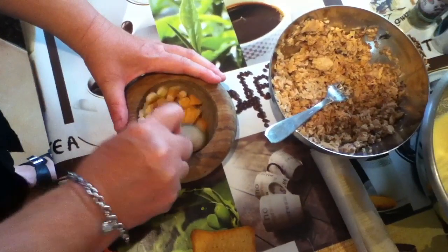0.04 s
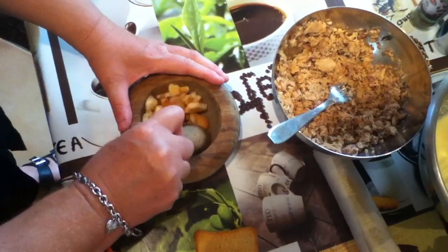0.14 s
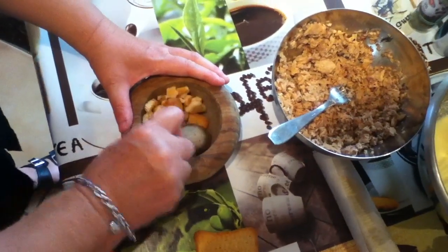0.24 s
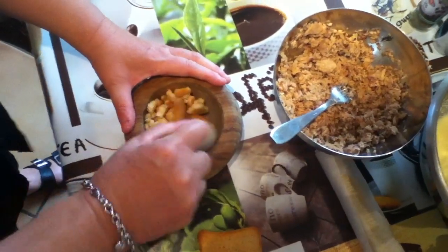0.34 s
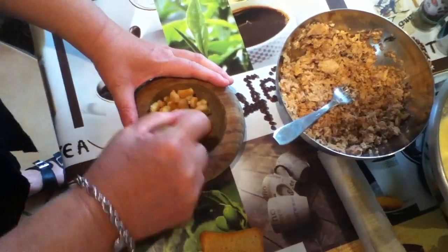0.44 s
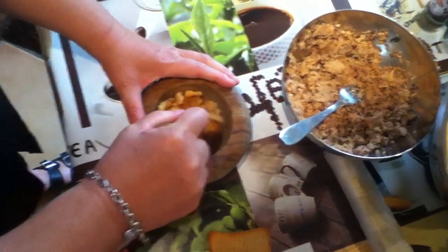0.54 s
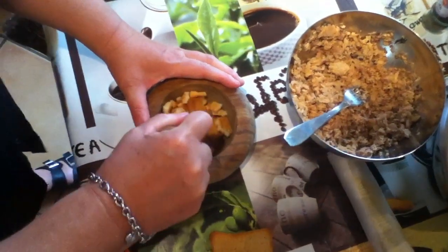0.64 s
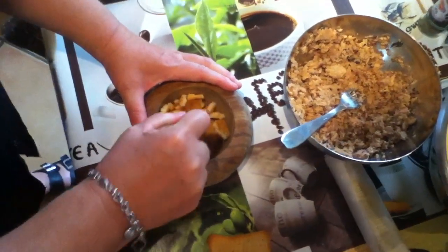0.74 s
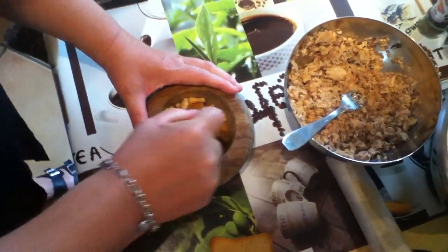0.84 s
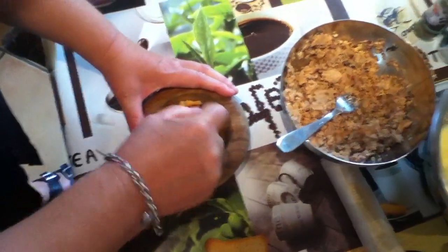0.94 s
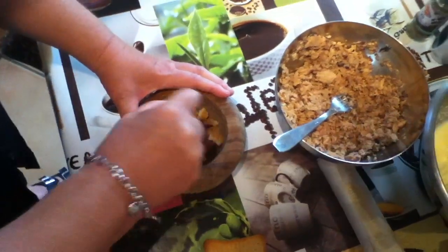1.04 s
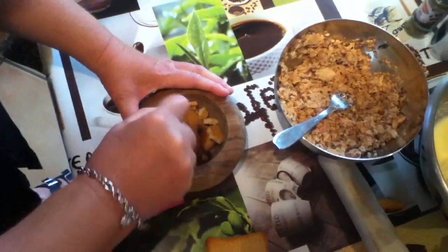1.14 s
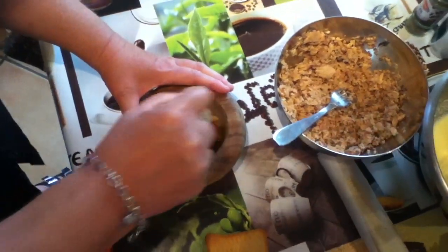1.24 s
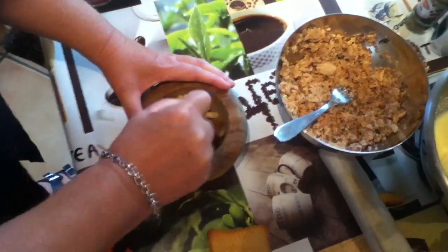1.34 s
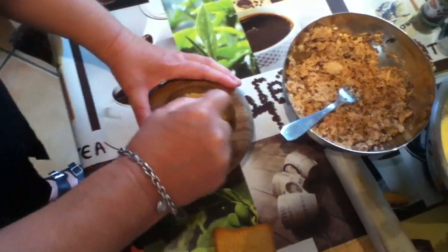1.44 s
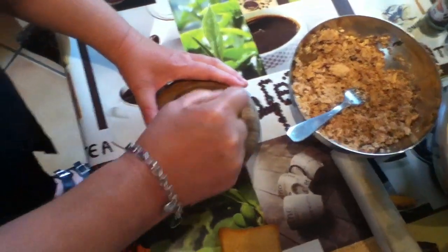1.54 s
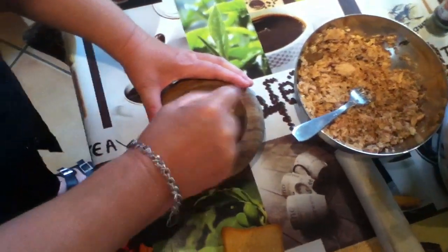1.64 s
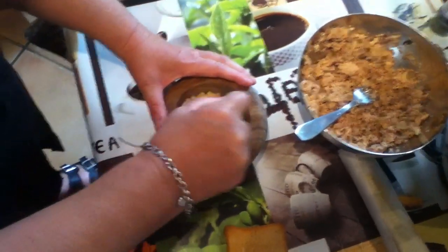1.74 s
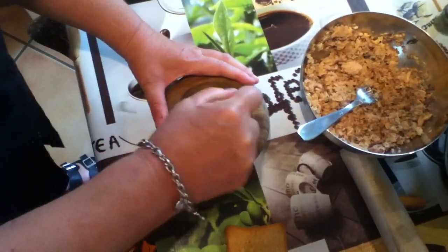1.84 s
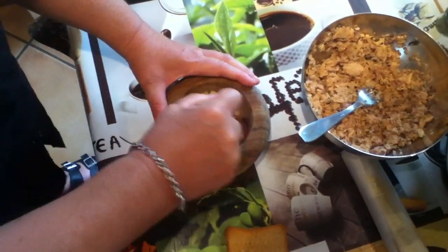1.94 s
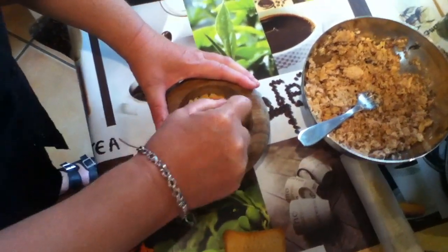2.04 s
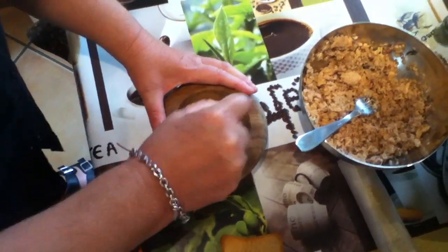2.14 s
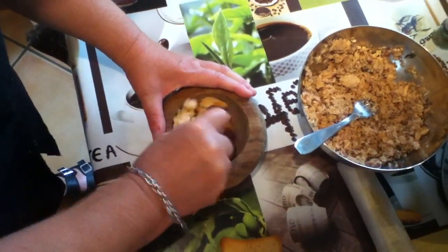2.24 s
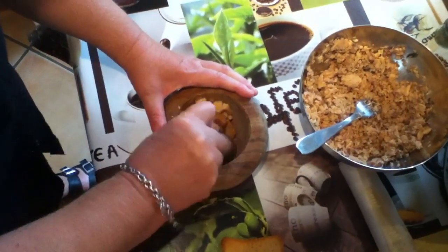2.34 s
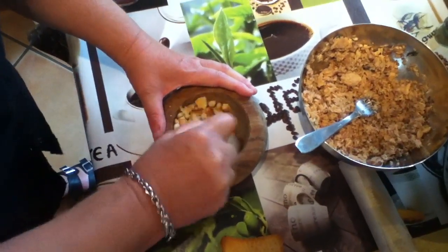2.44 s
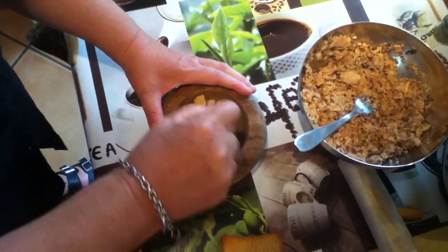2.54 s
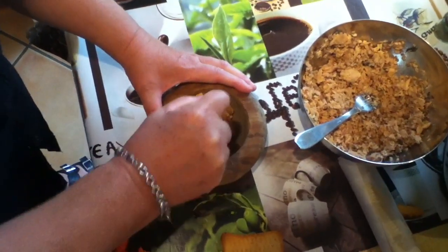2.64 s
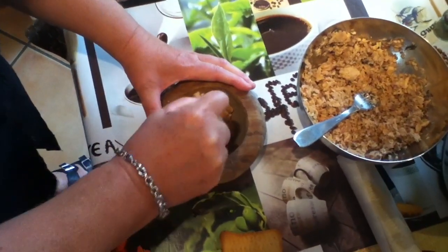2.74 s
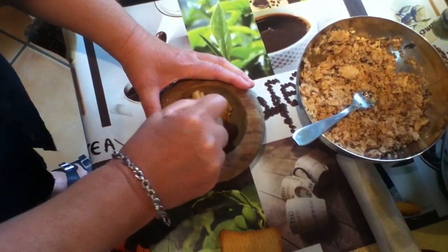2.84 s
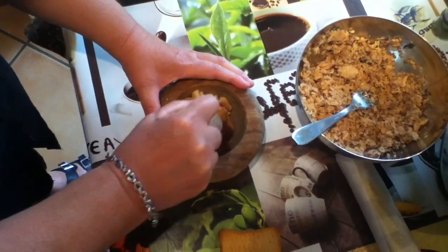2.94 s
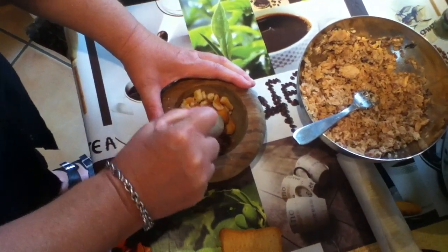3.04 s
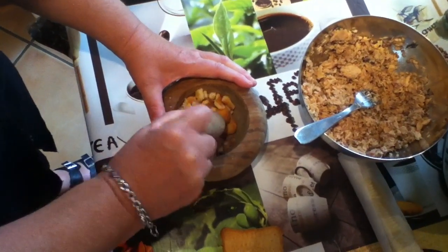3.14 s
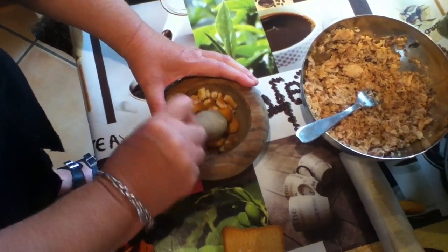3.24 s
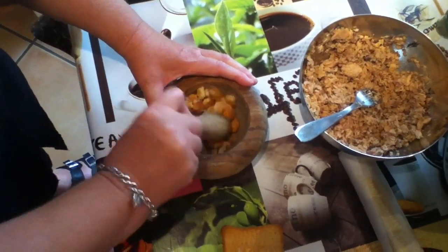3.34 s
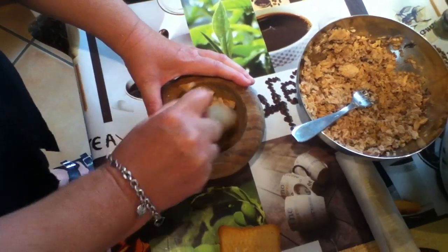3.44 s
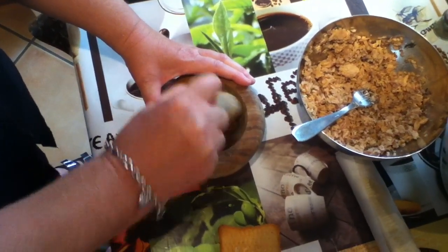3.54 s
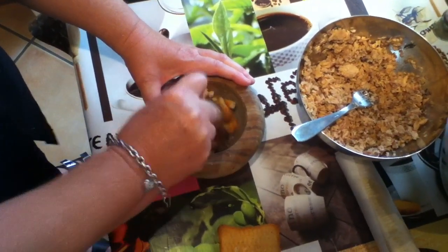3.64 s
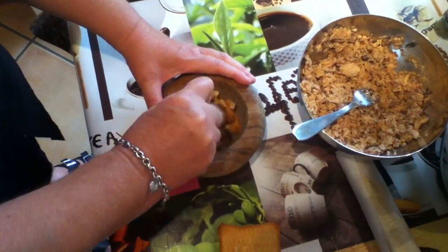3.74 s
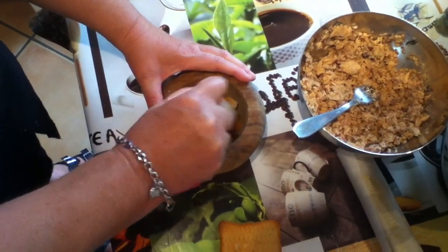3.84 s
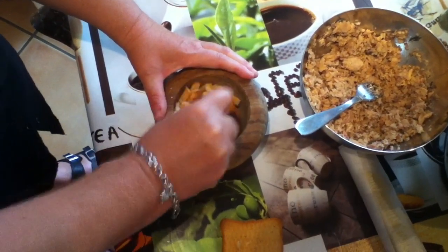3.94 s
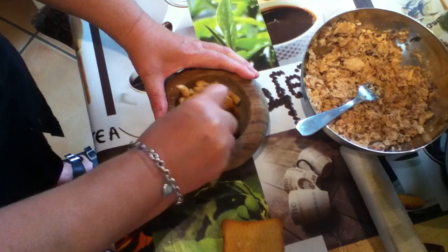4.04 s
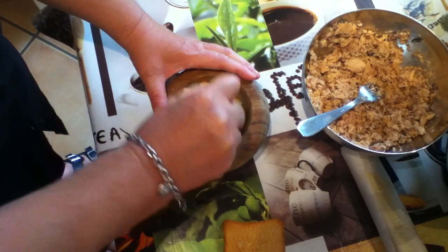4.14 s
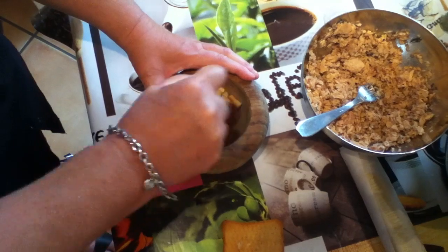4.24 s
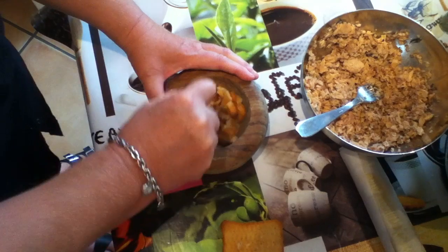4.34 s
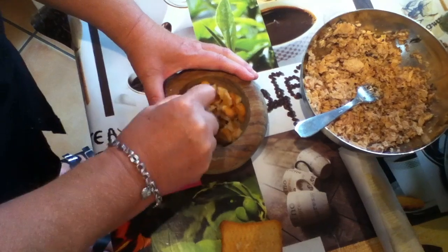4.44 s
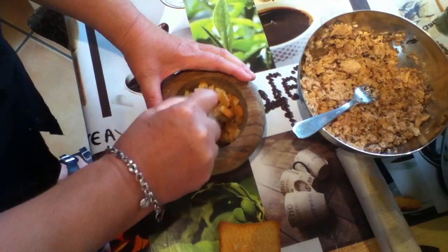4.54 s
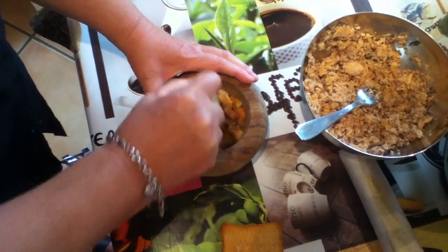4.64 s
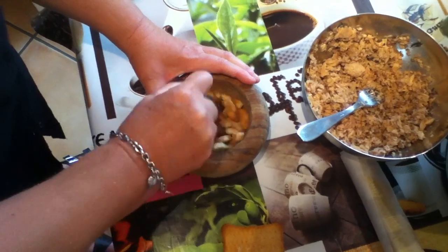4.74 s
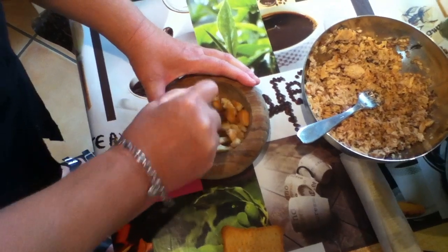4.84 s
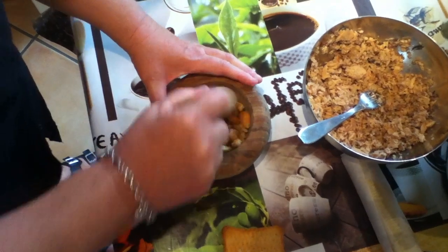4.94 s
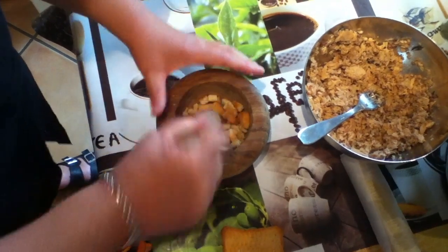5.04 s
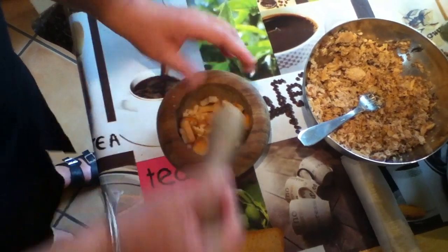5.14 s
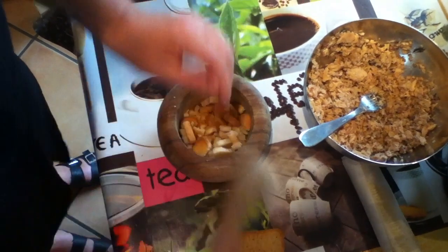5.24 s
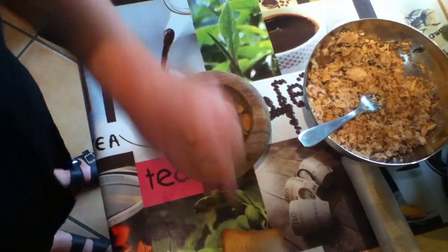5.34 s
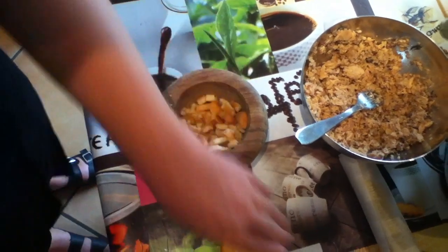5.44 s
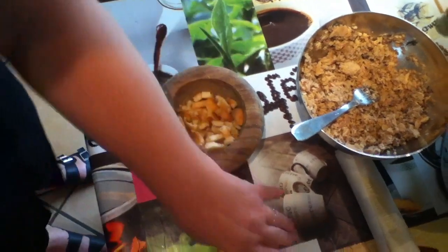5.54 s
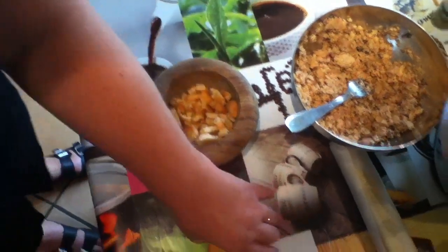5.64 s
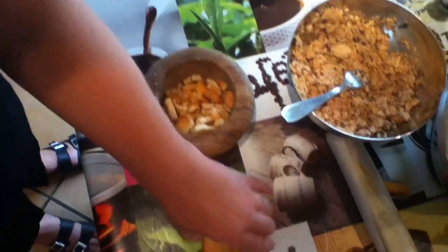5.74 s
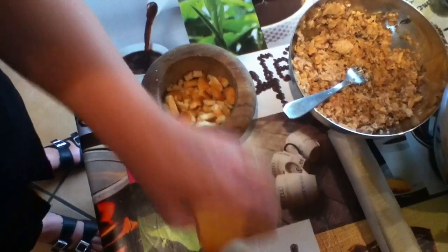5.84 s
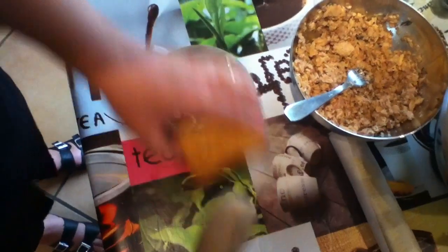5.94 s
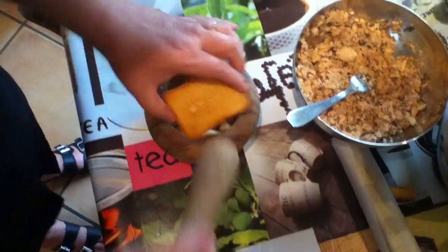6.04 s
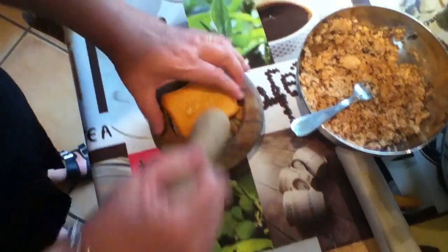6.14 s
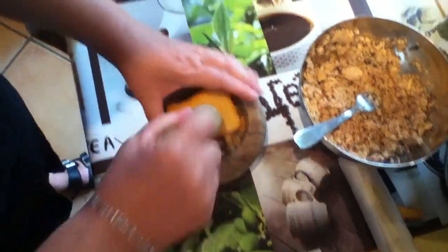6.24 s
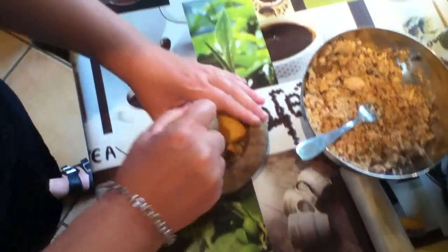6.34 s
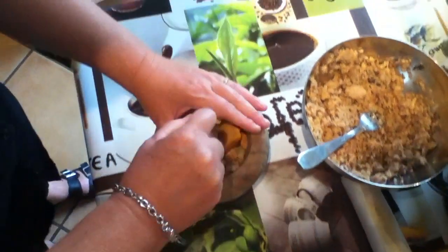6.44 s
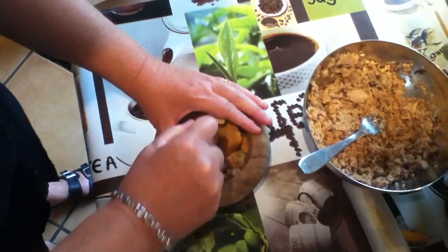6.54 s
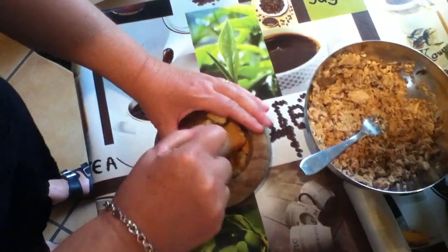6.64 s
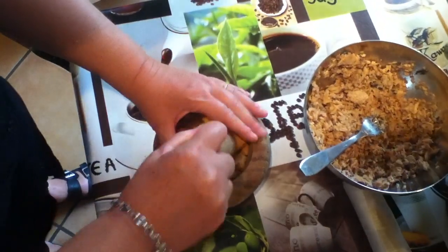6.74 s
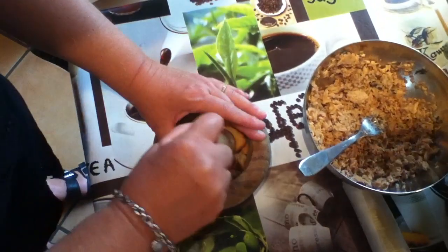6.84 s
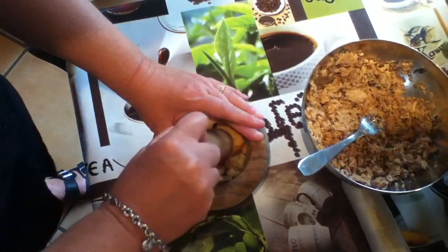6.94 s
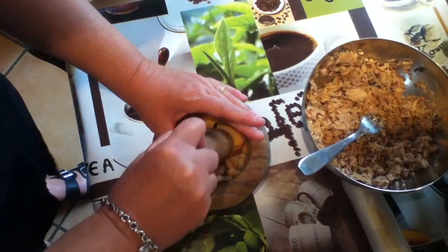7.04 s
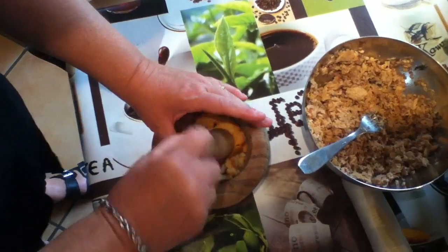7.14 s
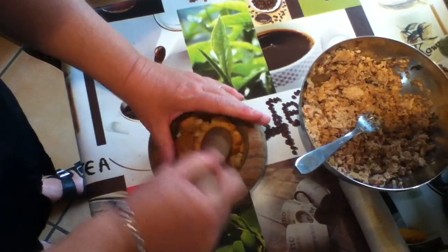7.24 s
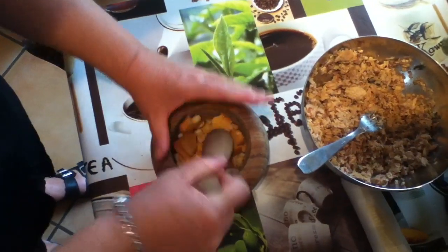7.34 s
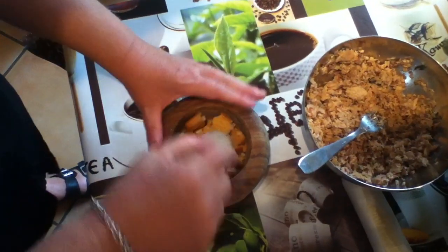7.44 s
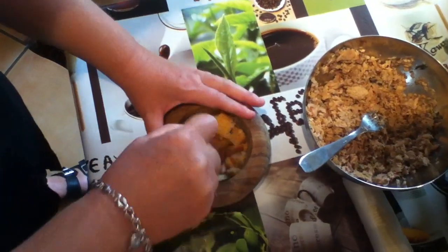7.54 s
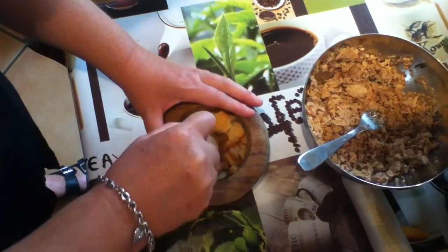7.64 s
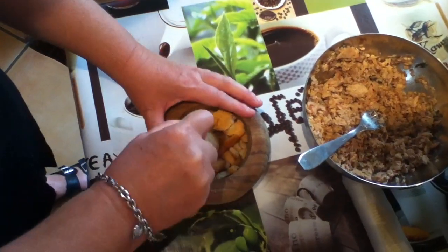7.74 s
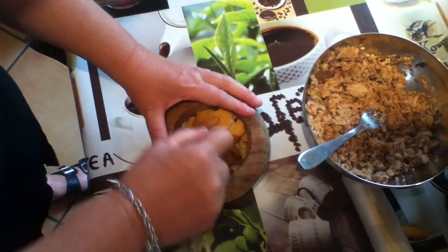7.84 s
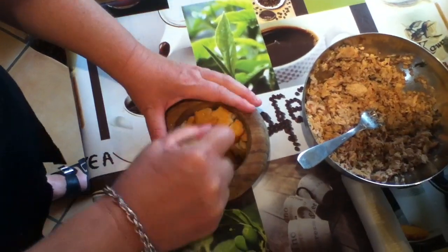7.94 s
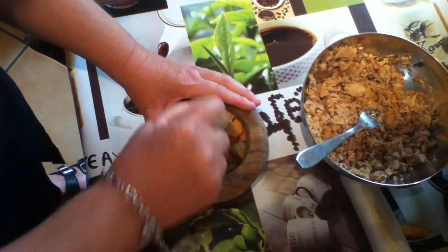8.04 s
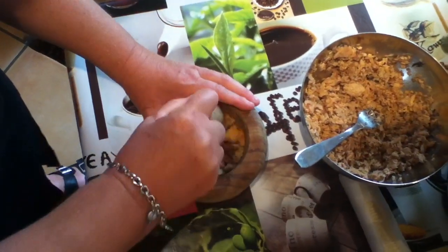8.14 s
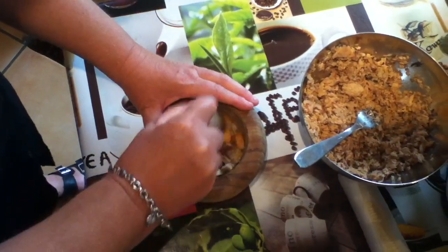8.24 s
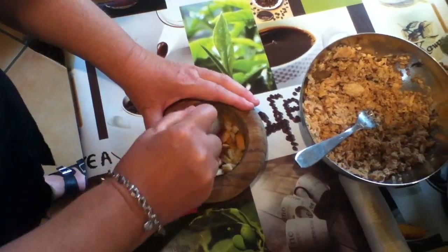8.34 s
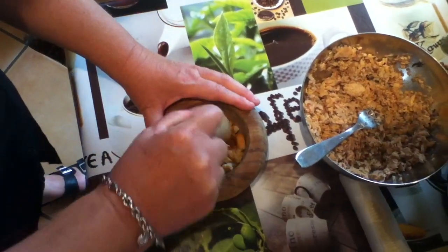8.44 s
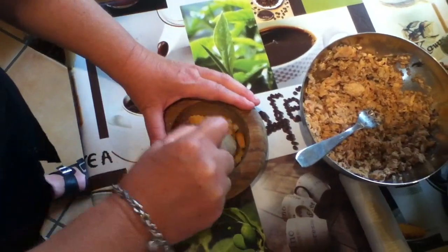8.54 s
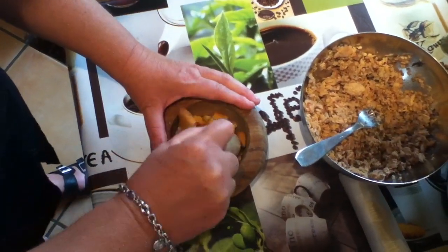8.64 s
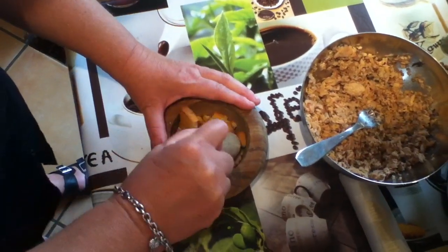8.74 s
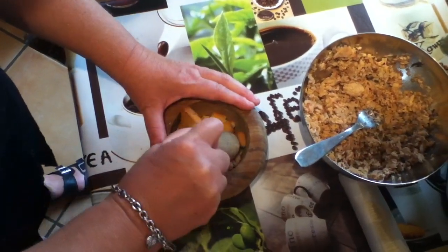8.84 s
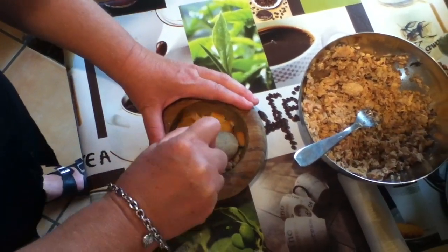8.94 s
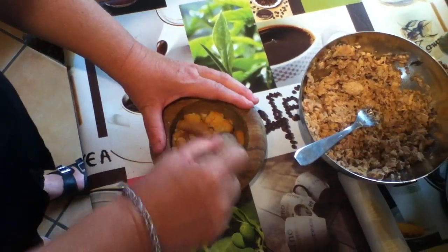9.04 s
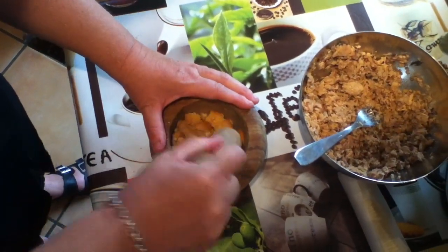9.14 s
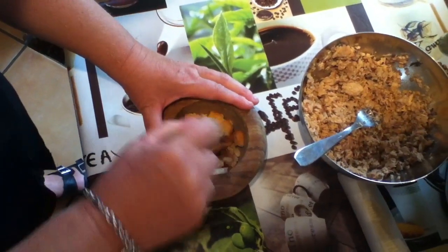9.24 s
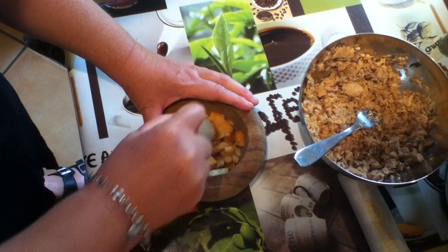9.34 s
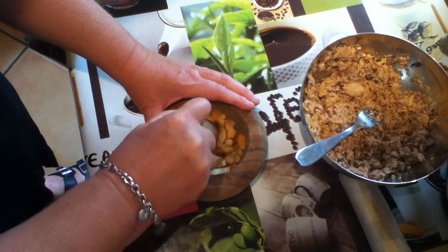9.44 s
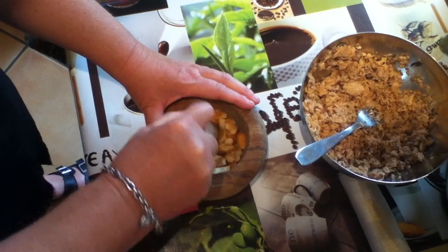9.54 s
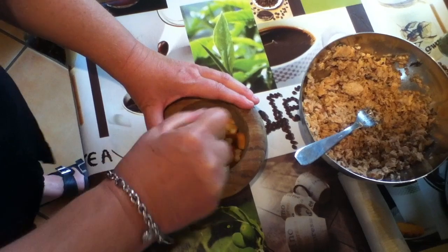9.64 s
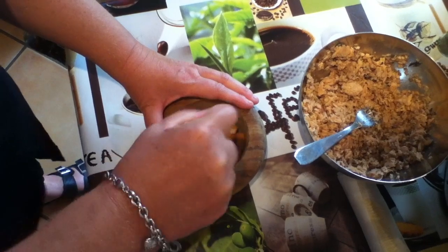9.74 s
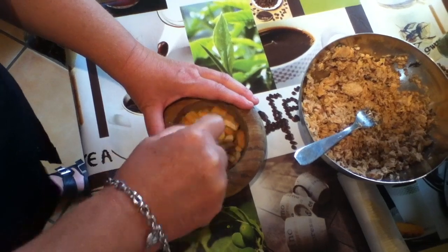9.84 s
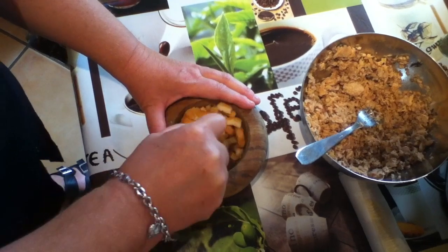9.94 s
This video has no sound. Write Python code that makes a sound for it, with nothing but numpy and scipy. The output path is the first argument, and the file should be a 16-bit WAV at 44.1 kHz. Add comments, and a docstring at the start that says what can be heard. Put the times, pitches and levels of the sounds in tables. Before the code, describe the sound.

Dry crisp toast breaks up in a wooden mortar: uneven bursts of crackle and fine crumbly fizz, hard pieces ticking, the pestle sometimes knocking bare wood and thudding the table. After a short, nearly quiet gap in the middle, new pieces are crushed with coarse crunches and a heavy knock. The microphone is close and fairly dry, with slight small-room reflections and a low steady hum.

```python
"""In a small kitchen, a wooden pestle crushes dry rusks in a wooden mortar on a table.
Each push makes the toast give way in bursts of tiny fractures: random clicks that ring the bowl and
the pestle and thump the table. Hard pieces snap with sharp filtered ticks, and the pestle now and then
knocks on bare wood, heard as dying sine waves. Behind it lie shaped noise and an appliance's wavering hum."""
import sys
import numpy as np
from scipy import signal
from scipy.fft import rfft, irfft
from scipy.io import wavfile

SR = 44100
rng = np.random.default_rng(int(sys.argv[2]) if len(sys.argv) > 2 else 0)


def generate_wav(sig):
    """Save sig (samples, or channels by samples) to the path in sys.argv[1] as 16-bit PCM at SR."""
    pcm = np.round(np.clip(np.atleast_2d(sig).T, -1, 1) * 32767).astype(np.int16)
    wavfile.write(sys.argv[1], SR, pcm)


N = 440118  # length in samples

# Natural tones of the mortar bowl, of the pestle, and of the table under the mortar.
# Each row: frequency in Hz, relative level in dB, time to fade by 60 dB in seconds.
BOWL_MODES = [(733, -1.5, 0.16), (803, 3, 0.23), (904, 13, 0.075), (981, 9.5, 0.14), (1110, -36, 0.049),
              (1175, -9, 0.26), (1351, 16.5, 0.029), (1410, -11, 0.018), (1526, 10, 0.0099)]
PESTLE_MODES = [(2000, -46, 0.058), (2246, -24, 0.048), (2120, 10.5, 0.066), (2214, -0.5, 0.099),
                (2290, 5.5, 0.092), (2280, -14.5, .08), (2730, 6, 0.14), (3300, -37, 0.13),
                (3370, -3, 0.045)]
TABLE_MODES = [(134, 0, .19), (190, -7, .06), (216, -2, .1), (243, -3, .08), (288, -1, .11),
               (325, -1.5, .13), (365, -4.5, .1), (405, -7.5, .08)]

# Colour of the coarse fractures, and of those muffled deep in the bowl.
# Each row: frequency in Hz, relative level in dB.
CRUNCH_COLOUR = [(500, -53), (1200, -0.5), (1750, -3), (2150, 5.5), (2900, 2.5), (4100, 2), (5000, -2),
                 (5900, -2), (7000, -21), (16000, -38.5)]
HOLLOW_COLOUR = [(100, -14.5), (500, -19.5), (680, -2.5), (950, 10.5), (1500, 5), (1800, -1), (2600, -21.5),
                 (8000, -55.5)]

# The pushes of the pestle.
# Each row: touch in seconds, pressing time until the toast gives way in seconds, collapse length in
# seconds, crumbling level in dB, collapse level in dB, extra bowl ring in dB, extra table thump in dB.
PUSH_ROWS = [(0.097, 0.032, 0.088, -22.5, -25.5, -8, -8.5), (.272, 0.019, 0.12, -31, -40.5, -4.5, 3),
             (.594, 0.032, 0.014, -31.5, -21, -5.5, -5), (.856, 0.0026, 0.011, -36, -28, -3.5, -3),
             (1.081, .006, 0.021, -18, -28.5, -5.5, -8), (1.141, .03, 0.06, -43, -42.5, 4, -6),
             (1.263, 0.012, 0.012, -45, -40.5, -0.5, -9), (1.468, 0.002, 0.0032, -24, -12.5, -2, -2),
             (1.749, 0.0027, 0.0095, -18, -12.5, -6, -21), (2.012, .004, 0.0026, -22, -14, -6, -4.5),
             (2.268, .038, 0.029, -26.5, -21.5, -5.5, -8), (2.378, 0.13, 0.0057, -41, -38.5, -4, -8),
             (2.689, 0.027, 0.0026, -54, -18, -11, -3), (2.752, 0.059, 0.037, -39, -21, -13, -5),
             (2.928, 0.12, 0.022, -39.5, -20, -13, -5.5), (3.108, 0.12, .135, -41.5, -38, -4.5, -8.5),
             (3.393, 0.033, 0.027, -36, -17, -10.5, -8.5), (3.723, 0.029, 0.026, -29, -13.5, -11, -4),
             (4.032, .008, 0.023, -31, -16, -7.5, -1), (4.362, 0.078, 0.039, -24.5, -20, -8.5, -7.5),
             (4.52, 0.062, 0.027, -37, -46, -9, -2.5), (4.758, 0.073, 0.025, -21, -18, -10, -4.5),
             (5.133, 0.0018, 0.00097, -43, -33, -6.5, -18), (6.217, 0.00059, .001, -38, -31, -1, -3),
             (6.421, 0.0031, 0.0092, -19, -17, 3, -4.5), (6.461, 0.047, 0.034, -24.5, -19, -7.5, -6),
             (6.858, 0.021, 0.0093, -52, -22, 2, -2.5), (6.933, 0.037, 0.0047, -39, -29, -5, 0.5),
             (6.996, 0.0042, 0.023, -27, -22.5, -9, -2.5), (7.12, 0.086, 0.0035, -38.5, -16.5, -11.5, -4),
             (7.228, 0.1, 0.041, -28, -27.5, -8.5, -3), (7.64, 0.0024, 0.051, -27, -24.5, -3, -20),
             (7.7, 0.077, 0.019, -24.5, -26, -7, -1), (7.808, 0.037, 0.084, -31.5, -26, -3, -2.5),
             (8.175, 0.018, 0.02, -29, -23, -1.5, -4), (8.223, .004, 0.046, -19, -20, -13, 0.5),
             (8.292, 0.06, .016, -22.5, -16, -9.5, -7.5), (8.62, 0.032, 0.11, -39, -24, -6, -5),
             (8.798, 0.1, 0.094, -39, -28.5, -10, -4.5), (9.071, 0.031, 0.039, -54, -24, -8, -4),
             (9.385, 0.022, 0.14, -32.5, -29.5, -0.5, -4), (9.535, 0.0092, 0.0092, -24, -12.5, -7, -5),
             (9.601, 0.066, 0.0088, -42, -38, -8, -4), (9.904, 0.053, .03, -26.5, -23.5, 0, -6)]


def amp(db):
    """Turns decibels into gain."""
    return 10 ** (np.asarray(db) / 20)


def unit(x):
    """Scales a response to energy 1."""
    return x / np.sqrt(np.sum(x ** 2) + 1e-20)


def read(points, hz):
    """Reads a table between its rows, along a log-frequency axis."""
    f, value = np.transpose(points)
    return np.interp(np.log(hz + 1), np.log(f + 1), value)


def add(mix, s, sound):
    """Mixes a sound in at s seconds."""
    part = mix[max(round(s * SR), 0):][:len(sound)]
    part += sound[:len(part)]


def through(x, response):
    """Passes a sound through a response."""
    return signal.oaconvolve(x, response)[:N]


def band_pass(x, low_hz, high_hz):
    """Keeps what lies between two frequencies."""
    return signal.sosfilt(signal.butter(2, [low_hz, high_hz], "band", fs=SR, output="sos"), x)


def high_pass(x, order, hz):
    """Keeps what lies above a frequency."""
    return signal.sosfilt(signal.butter(order, hz, "high", fs=SR, output="sos"), x)


def colour(points, size=2048):
    """Makes a click with the given spectrum and its energy as early as possible (minimum phase)."""
    hz = abs(np.fft.fftfreq(size, 1 / SR))
    log_gain = np.log(amp(read(points, hz)))
    spectrum = np.exp(np.conj(signal.hilbert(log_gain)))
    return unit(np.fft.ifft(spectrum).real[:size // 2])


def ring(modes, spread_db=0):
    """Rings a body as dying sine waves; where it is struck changes their shares."""
    t = np.arange(SR // 2) / SR
    shares = amp(spread_db * rng.standard_normal(len(modes)))
    out = np.zeros(len(t))
    for share, (hz, db, t60) in zip(shares, modes):
        out += share * amp(db - 60 * t / t60) * np.sin(2 * np.pi * hz * t)
    return out


def scatter(fall_s, db, size=600):
    """A click and its quick bounces between the walls of the bowl, as fading noise."""
    t = np.arange(size) / SR
    bounces = amp(db) * unit(rng.standard_normal(size) * np.exp(-t / fall_s))
    return unit(bounces + (t == 0))


def background(waver_hz=4, waver=0.39):
    """Steady air noise and the slightly wavering tones of an appliance."""
    # Spectrum of the air noise. Each row: frequency in Hz, relative level in dB.
    air_colour = [(15, -59), (25, -8), (108, -14.5), (120, -7), (137, 0.5), (200, -8.5), (263, -6),
                  (326, -7), (427, -14.5), (754, -13.5), (818, -13), (1290, -17.5), (1790, -14.5),
                  (2220, -20.5), (16000, -35)]
    # The appliance's tones. Each row: frequency in Hz, level in dB.
    hum_tones = [(100, -67.5), (150, -69), (199.5, -57), (329, -60), (807, -67.5), (1701, -80.5),
                 (1750, -59), (1798, -72), (1845, -64)]
    hz, t = np.fft.rfftfreq(N, 1 / SR), np.arange(N) / SR
    noise = rfft(rng.standard_normal(N))
    air = unit(irfft(noise * amp(read(air_colour, hz)), N)) * np.sqrt(N)
    hum, knots = np.zeros(N), np.linspace(0, t[-1], num=260)
    for tone_hz, db in hum_tones:
        # pitch and loudness wander separately
        drift = np.interp(t, knots, rng.standard_normal(len(knots)))
        flutter = np.interp(t, knots, rng.standard_normal(len(knots)))
        phase = 2 * np.pi * np.cumsum(tone_hz + waver_hz * drift) / SR
        hum += amp(db) * np.sqrt(2) * (1 + waver * flutter) * np.sin(phase)
    return amp(-48) * air + hum


def kitchen(x, delay_s=0.0026):
    """Dense reflections of a small room: fading noise whose treble dies sooner than its bass."""
    # How long the room rings. Each row: frequency in Hz, time to fade by 60 dB in seconds.
    room_fade = [(150, 0.52), (800, 0.46), (2200, 0.39), (6000, 0.3), (14000, 0.35)]
    hz, t, z = signal.stft(rng.standard_normal(SR // 2), SR, nperseg=256)
    fade = amp(-60 * t / read(room_fade, hz)[:, None])
    tail = signal.istft(z * fade, SR, nperseg=256)[1]
    # reflections build up over the first moments
    onset = np.minimum(np.arange(len(tail)) / SR / delay_s, 1) ** 2
    return through(x, unit(tail * onset))


def thuds(contact_s=0.002):
    """The pestle bottoms out: a smooth push on the table that favours its lowest modes."""
    # The booms. Each row: start in seconds, peak level in dB before the band filter.
    thud_rows = [(.189, -12), (0.22, -12.5), (.29, -17.5), (0.339, -19), (1.472, -10.5), (1.762, -11.5),
                 (2.02, -12), (6.254, -19.5), (7.009, -13.5), (8.227, -7.5), (8.25, -17), (8.355, -12.5),
                 (9.956, -11.5)]
    out = np.zeros(N)
    t = np.arange(SR // 50) / SR
    push = np.sin(np.pi * np.minimum(t / contact_s, 1)) ** 2
    for s, db in thud_rows:
        boom = signal.oaconvolve(ring(TABLE_MODES, spread_db=8.0), push)
        add(out, s, amp(db) * boom / abs(boom).max())
    return band_pass(out, 85, 450)


def knocks():
    """The pestle breaks through to the bowl: both ring, with a dry click and a hollow clack at contact."""
    # Wood meets wood. Each row: start in seconds, bowl strength in dB, pestle strength in dB.
    knock_rows = [(.122, -11.5, -14), (.447, -15, -28.5), (1.471, -20, -8.5), (2.016, -39, -8),
                  (2.301, -29.5, -4.5), (4.04, -4, -24), (6.246, -13, -30), (6.256, -2, -24),
                  (6.423, -23, -12), (7.643, -5.5, -33), (8.229, 1, -5.5), (9.543, -16, -9.5),
                  (9.961, -28, -6)]
    out = np.zeros(N)
    for s, bowl_db, pestle_db in knock_rows:
        click_db = max(bowl_db, pestle_db) - 11  # follows the stronger of the two
        click = np.convolve(scatter(fall_s=0.00083, db=6.0), colour(CRUNCH_COLOUR))
        clack = np.convolve(scatter(fall_s=0.0078, db=3), colour(HOLLOW_COLOUR))
        parts = [(bowl_db - 6.5, ring(BOWL_MODES)), (bowl_db - 13.0, clack),
                 (pestle_db, ring(PESTLE_MODES, spread_db=-4.0)), (click_db, click)]
        for db, sound in parts:
            add(out, s, amp(db) * sound / abs(sound).max())
    # the small bowl radiates little below its first mode
    return high_pass(out, 3, 620)


def strays(count=3, within_s=0.25, spread_db=3):
    """Time, level and pitch of small pieces that snap at random in the moments after each touch."""
    rows = []
    for s, press_s, length_s, *_ in PUSH_ROWS:
        lateness = within_s * rng.random(count)
        for late_s, (size, pitch) in zip(lateness, rng.standard_normal((count, 2))):
            # weaker by 4.5 dB with every length of the push that has gone by
            fade_db = 4.5 * late_s / (press_s + length_s)
            hz = 2400 * 2 ** (0.16 * pitch)  # spread in octaves
            rows.append((s + late_s, -22.5 - fade_db + spread_db * size, hz))
    return rows


def snaps(width=1.0, bowl_db=-27):
    """A hard piece breaks with one sharp tick that faintly rings the bowl."""
    # Single snaps of hard pieces, loud and faint.
    # Each row: start in seconds, relative peak level in dB, centre in Hz.
    single_snaps = [(0.2796, -12, 3500), (0.9062, -15, 2460), (0.9404, -14, 2120), (1.063, -19, 1840),
                    (1.0858, -10.5, 1790), (1.1463, -22, 4220), (1.1654, -10.5, 2930), (1.2173, -15, 1840),
                    (1.7541, -6, 2620), (2.22, -26.5, 2160), (2.944, -11.5, 2170), (3.1754, -11, 3980),
                    (3.3508, -24, 5210), (3.449, -9, 3600), (3.799, -4, 2730), (4.309, -29, 2120),
                    (4.6243, -16.5, 2670), (5.136, -29, 2900), (5.333, -26, 3390), (6.218, -13.5, 1200),
                    (6.302, -25, 4000), (6.7055, -19, 6400), (6.7517, -20, 4120), (6.9504, -10, 2120),
                    (6.998, -3, 2050), (7.1157, -13, 1970), (7.1507, -10.5, 5070), (7.4987, -22.5, 2290),
                    (7.641, -13, 1120), (8.228, -22, 2000), (8.748, -26, 1980), (8.809, -7, 2340),
                    (9.4622, -18, 1110), (9.541, -6, 2400), (9.643, -13, 1860)]
    out, bowl = np.zeros(N), ring(BOWL_MODES)
    for s, db, hz in single_snaps + strays():
        edges = [hz / (1 + width), min(hz * (1 + width), SR / 2 - 1)]
        band = signal.butter(1, edges, "band", fs=SR)
        tick = signal.lfilter(*band, scatter(fall_s=0.0017, db=40))
        add(out, s, amp(db) * tick / abs(tick).max())
        add(out, s, amp(db + bowl_db) * bowl / abs(bowl).max())
    return amp(-3.0) * band_pass(out, 800, 10000)


def clumps(depth_db, per_s=260):
    """One fracture sets off its neighbours, so a wandering gain gathers them in short avalanches."""
    wander = np.interp(np.arange(N) / SR * per_s, np.arange(N), rng.standard_normal(N))
    gain = amp(depth_db * np.clip(wander, -1.6, 1.6))
    return unit(gain) * np.sqrt(N)


def grains(per_s, spread_db, largest=4.4):
    """A steady stream of clicks of uneven size, rms 1."""
    size = amp(spread_db * np.minimum(rng.exponential(1, N), largest))
    clicks = size * rng.choice([-1, 1], N) * (rng.random(N) < per_s / SR)
    return unit(clicks) * np.sqrt(N)


def fractures(per_s, spread_db, fall_s, bounce_db, chip_db, low_hz, high_hz, cycles=4, piece_s=.012, count=24):
    """Cracks of uneven size, rms near 1, that bounce in the bowl and ring the chips that they break."""
    size = amp(spread_db * np.minimum(rng.exponential(1, N), 3.5))
    chance = np.clip(per_s / SR, 1e-6, 1)
    clicks = size * rng.choice([-1, 1], N) * (rng.random(N) < chance)
    # keep the strength even when the rate changes
    clicks /= np.sqrt(chance * np.mean(size ** 2))
    # cracks that run through the same piece have nearly the same pitch
    piece = rng.random(N)[(np.arange(N) / SR / piece_s).astype(int)]
    kind = ((piece + .13 * rng.standard_normal(N)) % 1 * count).astype(int)
    t, out = np.arange(600) / SR, np.zeros(N)
    # each kind of chip has its own pitch and its own bounces
    for k, hz in enumerate(np.geomspace(low_hz, high_hz, count)):
        chip = amp(chip_db) * unit(np.sin(2 * np.pi * hz * t) * np.exp(-hz * t / cycles))
        out += through(clicks * (kind == k), unit(scatter(fall_s, bounce_db) + chip))
    return out


def collapses(count=4):
    """Strength of crunch, fizz, bowl and thump: toast crumbles, gives way in an avalanche, and settles."""
    # How crunch, fizz, bowl and thump follow a push. Each row: dB while crumbling, dB in the collapse,
    # dB while settling, dB per dB of force, lag in seconds.
    follow_rows = [(-2.5, 1, 6.5, 1, 0), (-8, -5.5, 5.5, 0.8642, 0.0016), (-1.5, -1.5, 3, 1, 0.0027),
                   (-2, 0.5, 6, 0.6829, 0.0093)]
    # Fine fizz over the crunch as time goes on. Each row: time in seconds, extra level in dB.
    fizz_level = [(0, 2.5), (.9, 1.5), (1.5, 0.5), (1.8, -0.5), (2.05, 0.5), (2.8, 2), (3.6, 0.5),
                  (4.6, -2), (6.4, 2.5), (7.2, -0.5), (9.9, -0.5)]
    touch_s, avalanche_s, release_s = 0.0053, 0.014, 0.012
    settle_db, settle_s = -27, 0.056  # crumbs go on settling after a collapse
    usual_db = -28.5  # a push of ordinary force
    t, power = np.arange(SR) / SR, np.zeros((count, N))
    for s, press_s, length_s, crumble_db, collapse_db, bowl_db, thump_db in PUSH_ROWS:
        touch = np.minimum(t / min(press_s, touch_s), 1)
        build = np.exp(np.minimum(t - press_s, 0) / avalanche_s)
        after = np.maximum(t - press_s - length_s, 0)
        held = np.exp(-after / release_s)
        crumbling = touch * (1 - build)
        collapsing = touch * build * held
        settling = amp(settle_db) * (1 - held) * np.exp(-after / settle_s)
        phases = crumbling, collapsing, settling
        forces = np.array([crumble_db, collapse_db, collapse_db]) - usual_db
        fizz_db = np.interp(s, *np.transpose(fizz_level))
        own_levels = 0, fizz_db, bowl_db, thump_db
        for layer, own_db, (*phase_db, slope, lag_s) in zip(power, own_levels, follow_rows):
            gains = amp(usual_db + slope * forces + phase_db + own_db)
            add(layer, s + lag_s, (gains @ phases) ** 2)
    return np.sqrt(power)


def crushing():
    """Tiny fractures radiate directly and shake pestle, bowl and table."""
    # Colour of the fine dust. Each row: frequency in Hz, relative level in dB.
    fizz_colour = [(2500, -48.5), (5000, 5), (6300, 2), (7000, 0), (8500, 1), (10500, -3), (13000, -7.5),
                   (16000, -14.5)]
    crunch, fizz, bowl, thump = collapses()
    # thousands a second at full load, fewer as the push dies away
    busy = np.clip(crunch / amp(-23.5), .03, 2) ** .72
    bursts = clumps(depth_db=3.3)
    cracks = bursts * fractures(3400 * busy, spread_db=1.5, fall_s=0.0023, bounce_db=12.5,
                                chip_db=-5.5, low_hz=1536, high_hz=7160)
    dust = bursts * fractures(6000 * busy, spread_db=0.5, fall_s=0.00043, bounce_db=16.0,
                              chip_db=-18.5, low_hz=5160, high_hz=14600)
    direct = amp(-4) * through(cracks * crunch, colour(CRUNCH_COLOUR))
    direct += through((amp(-8.5) * cracks + dust) * fizz, colour(fizz_colour))
    wood = amp(-15) * through(cracks * crunch, unit(ring(PESTLE_MODES)))
    bowl_taps = bursts * grains(per_s=4000, spread_db=4.0) * bowl
    wood += amp(-6.0) * through(bowl_taps, unit(ring(BOWL_MODES)))
    wood += amp(-3.5) * through(cracks * bowl, colour(HOLLOW_COLOUR))
    # the pestle drops in small jolts as the toast gives, and the table takes the load
    jolts = bursts * grains(per_s=700, spread_db=1.0) * thump
    table = band_pass(ring(TABLE_MODES), 125, 460)
    return direct + wood + amp(-0.4) * through(jolts, unit(table))


def scene():
    """The mortar close by, its echo in the kitchen, and the background."""
    mortar = crushing() + snaps() + knocks() + thuds()
    # bowl and table radiate almost nothing below the table's lowest mode
    mortar = high_pass(mortar, 4, 108)
    return (mortar + amp(-12.5) * kitchen(mortar) + background())[None]


def record(dry, edge_hz=15850):
    """Rounds off the highest peaks, then removes the treble above the band edge."""
    rounded = dry / (1 + dry ** 4) ** (1 / 4)
    low_pass = signal.firwin(511, edge_hz, window=("kaiser", 9), fs=SR)
    return signal.oaconvolve(rounded, low_pass[None], "same")


dry = scene()
out = record(dry)
generate_wav(out)
```